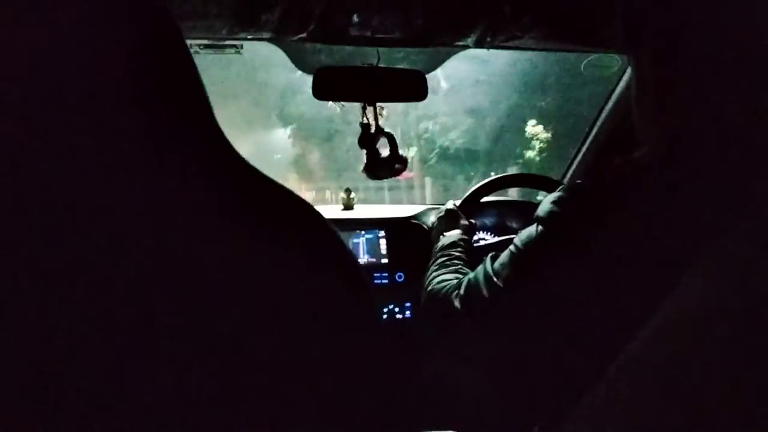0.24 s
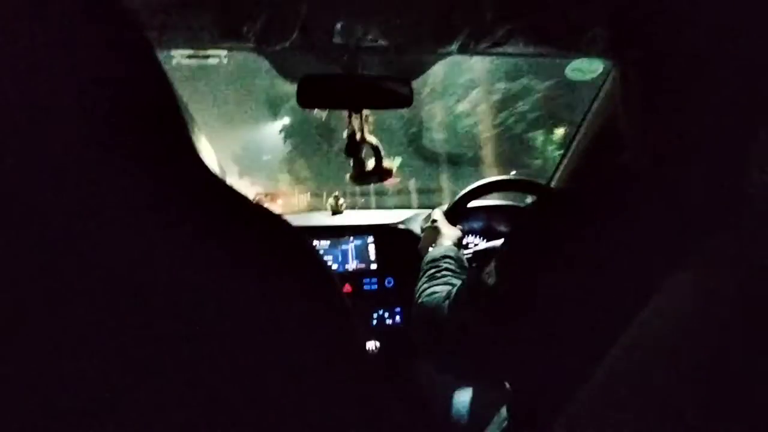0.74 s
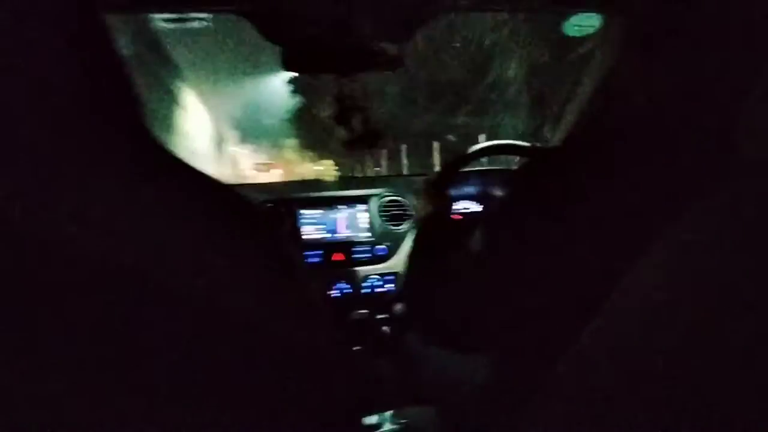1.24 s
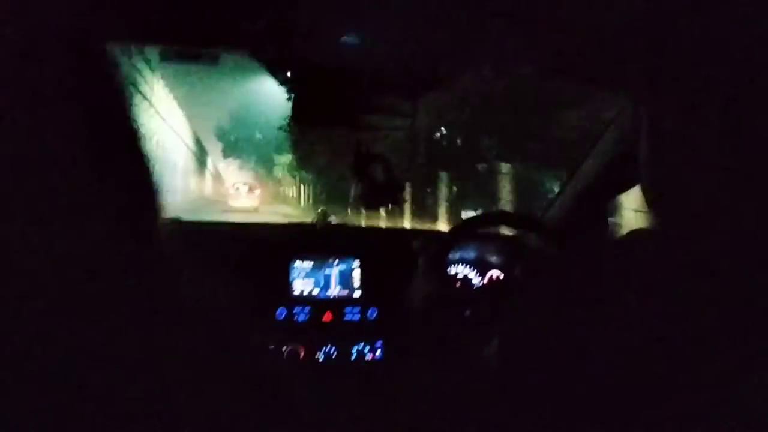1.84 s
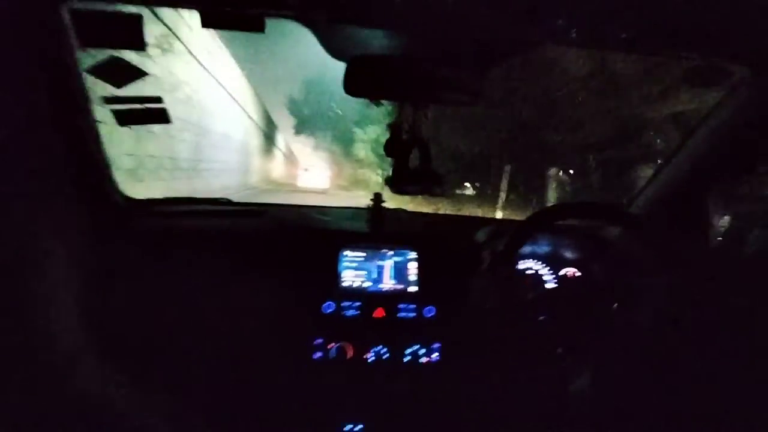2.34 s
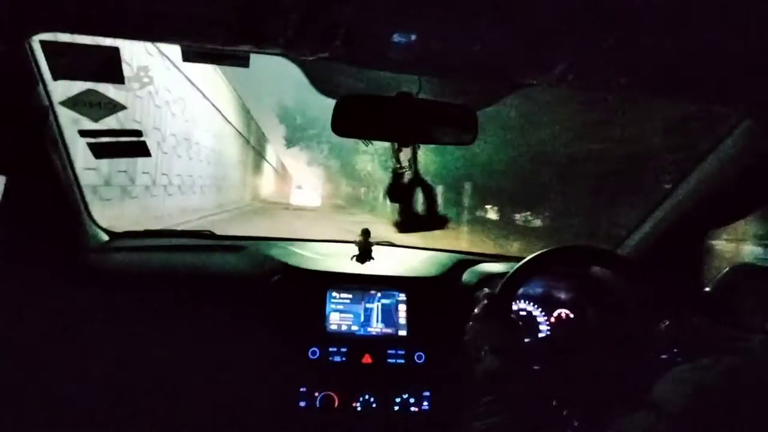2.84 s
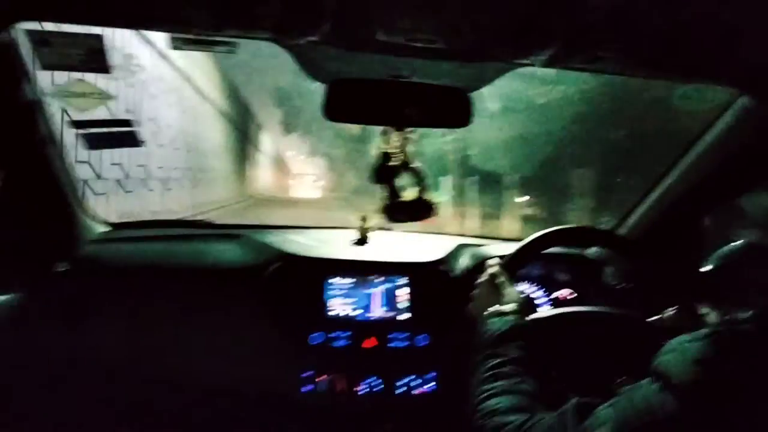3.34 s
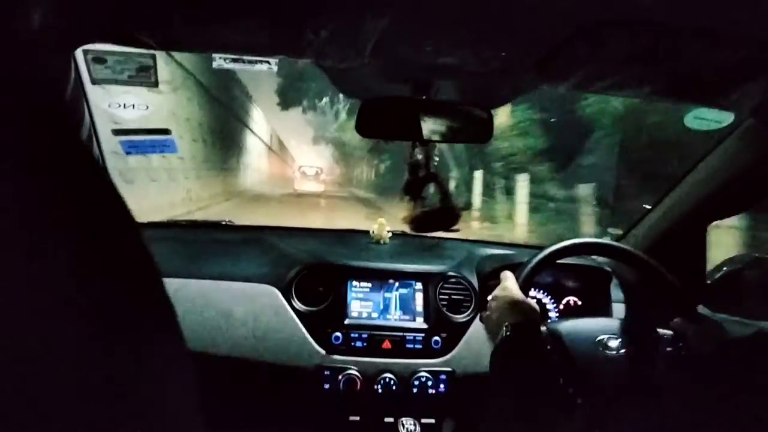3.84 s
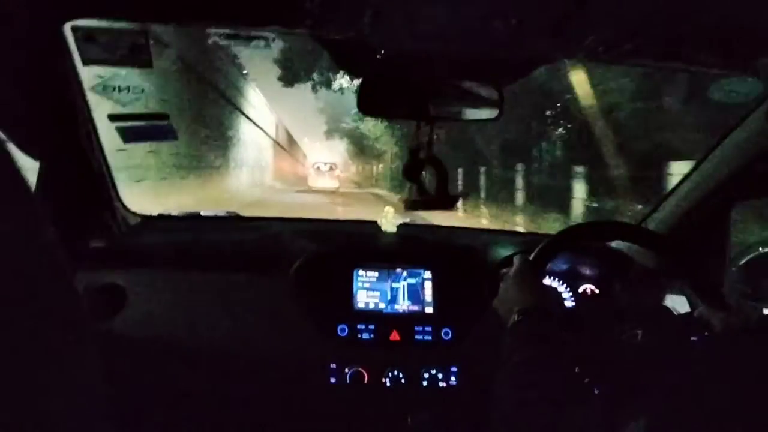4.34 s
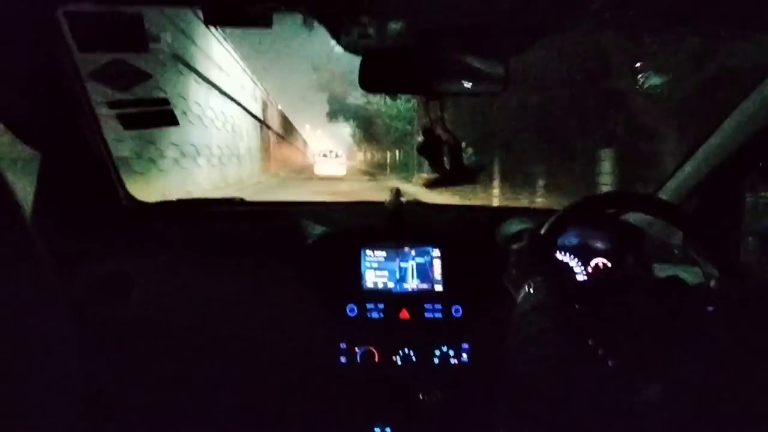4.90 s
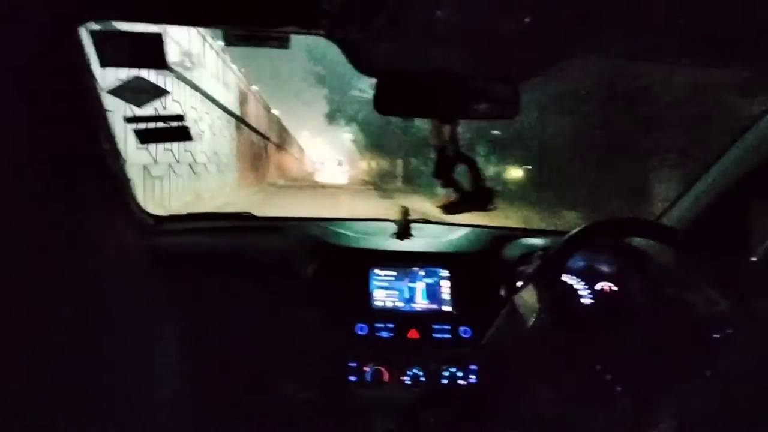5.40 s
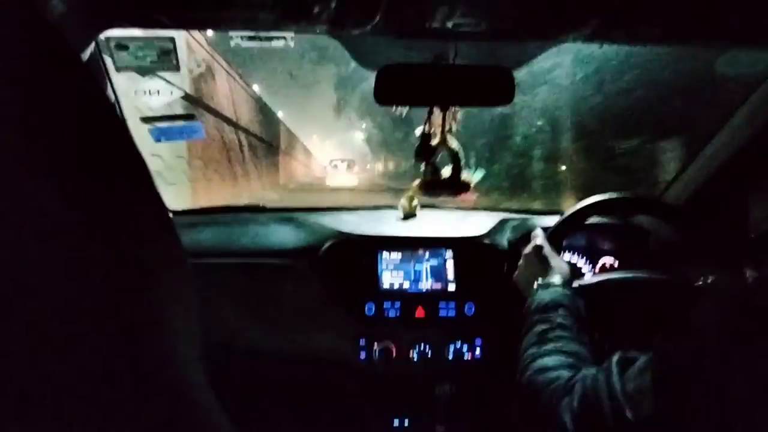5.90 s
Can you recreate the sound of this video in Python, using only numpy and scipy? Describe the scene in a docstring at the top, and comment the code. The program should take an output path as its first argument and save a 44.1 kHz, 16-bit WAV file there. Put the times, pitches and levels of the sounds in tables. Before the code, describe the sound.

A handheld microphone inside a closed car cabin picks up mostly bass: surging road rumble, soft tyre noise and an engine hum that quickly sinks and later partly returns. Sharp clicks and very brief cuts to silence interrupt, mostly at the start. Faint fabric rustles lie on top. A burst of four dull, ringing thumps comes past four seconds, then the drive settles.

```python
"""Inside a small car at night: filtered noise makes the rumble, roar and hiss, summed sines the rising engine hum.
The hum sinks in the first second and partly returns; coarse asphalt drums the floor at once and again near 4 s.
Three of six dropouts fall in the first second, three later; they and lone signal steps click.
Clothing scuffs from 0.27 s in grains of noise, and slides most between 1.2 and 2.7 s.
From 4.28 s four wheel blows on a rough patch jolt the cabin and ring the body in decaying sines."""
import sys
import numpy as np
from scipy import signal
from scipy.fft import rfft, irfft, next_fast_len
from scipy.io import wavfile
from scipy.ndimage import uniform_filter1d

SR = 44100
rng = np.random.default_rng(int(sys.argv[2]) if len(sys.argv) > 2 else 0)


def wrap_up_sound(samples):
    """Save the sound to the file named by the first command line argument, as 16-bit audio."""
    columns = np.atleast_2d(samples).T
    # keep every value between -1 and 1, then stretch to whole-number steps
    tamed = np.clip(columns, -1, 1)
    steps = np.round(tamed * 32767).astype(np.int16)
    wavfile.write(sys.argv[1], SR, steps)


N = 271567
TIME = np.arange(N) / SR  # s

# Unevenness of the road, as the level of the body's deep rumble: time_s, level_db
ROAD_UNEVENNESS = [(0, -35.5), (.33, -20.5), (.48, -28), (1.05, -30.5), (1.27, -28), (1.65, -34.5),
                   (2.08, -27), (2.47, -24.5), (2.58, -35.5), (2.9, -28.5), (3.52, -34.5), (3.72, -26.5),
                   (4.25, -24), (4.68, -20.5), (4.82, -30.5), (5.2, -28), (5.35, -30.5), (6.15, -31)]
USUAL_ROAD_DB = -30  # unevenness that leaves the panels and cabin air unchanged
# Coarse asphalt: start_s, end_s, panel_lift_db, air_lift_db
COARSE_STRETCHES = [(0, 0.39, 5.5, 5.5), (0.695, 0.837, 8.5, 9.5), (3.987, 4.403, 3, 2.5),
                    (4.454, 4.59, 11, 10)]
PANEL_LIFT, AIR_LIFT = 2, 3  # columns of COARSE_STRETCHES
# Spectrum of the body's rumble, relative: freq_hz, density_db (per Hz)
RUMBLE_SPECTRUM = [(8, -13.5), (18, -13.5), (30, 0.5), (45, 1), (58, -2), (72, -18.5), (100, -32),
                   (200, -42.5), (1000, -110)]
# Spectrum of the floor panels, relative: freq_hz, density_db (per Hz)
PANEL_SPECTRUM = [(20, -15), (50, -4.5), (68, 4), (95, 0.5), (118, -2), (135, -14), (180, -18), (300, -60),
                  (1000, -89)]
# Spectrum of the tyre roar, relative: freq_hz, density_db (per Hz)
ROAR_SPECTRUM = [(60, -10), (130, 0.5), (185, -1.5), (280, -2.5), (340, -10), (400, -7.5), (520, -12.5),
                 (780, -18.5), (1150, -18.5), (1400, -22.5), (1850, -24), (3000, -33.5), (3900, -37),
                 (5200, -46.5), (16000, -79)]
# Standing waves of the cabin air: freq_hz, width_hz, lift_db
CABIN_MODES = [(206, 29, 1), (239.5, 13.6, 6), (288, 29, 3), (385, 45, 3), (428, 24, 1), (531, 16, 3),
               (648, 32, 3.5), (1144, 59, 1.5)]
# Tread whine: time_s, level_db
WHINE_LEVEL = [(.2, -63), (.9, -65.5), (1.4, -63.5), (1.9, -77), (6.15, -67.5)]
# Engine speed and load: time_s, firing_rate_hz, level_db
ENGINE_RUN = [(0, 73.2, -25), (1, 75, -45), (2, 79.25, -38.5), (3, 80.56, -39), (4, 80.88, -33),
              (5, 81.52, -32), (6.15, 81.78, -36)]
# Balance of the engine orders: multiple of the firing rate, relative_level_db
ORDER_BALANCE = [(1, 8.5), (2, -39), (3, -12), (4, -30), (5, -37)]
# Spectrum of the air hiss, relative: freq_hz, density_db (per Hz)
HISS_SPECTRUM = [(1000, -5), (4000, -14), (5200, 2.5), (7200, 9.5), (8600, 4.5), (10800, 6), (12500, -1.5),
                 (14000, -6), (16000, -3)]
# Silences with a click at either edge: start_s, end_s, step_height_db
SILENCES = [(.0981, .1488, -33), (.4475, .5224, -28.5), (.6931, .7573, -29.5), (2.508, 2.558, -40),
            (3.9244, 4.003, -29.3), (4.4723, 4.538, -17.7)]
# Lone jumps in the signal: time_s, step_height_db
LONE_JUMPS = [(0.1917, -31.5), (.608, -19.5), (.6295, -32.5), (0.8219, -24), (2.7515, -29), (2.9861, -26.5),
              (4.046, -30.5), (4.0885, -24), (4.11, -31), (4.5812, -15.5)]
# Spectrum of the fabric, relative: freq_hz, density_db (per Hz)
FABRIC_SPECTRUM = [(400, -33), (1500, -1), (3000, 5.5), (4000, 7), (5000, 0), (6000, 5.5), (7000, 7.5),
                   (8800, 2.5), (11000, 3.5), (12500, -5), (14000, -12), (16000, -41)]
# Short scuffs and ticks of clothing: start_s, level_db, decay_s, brightness_db (per octave)
CLOTH_SCUFFS = [(0.271, -63, .005, -4), (0.86, -54, 0.0065, -2), (0.901, -63, 0.006, 8),
                (0.929, -52.5, 0.0062, 8), (1.054, -61.5, 0.013, 0), (1.104, -48, 0.0084, 4),
                (1.597, -55, 0.015, -4.5), (1.772, -47.5, 0.0077, -12.5), (2.3212, -35.5, 0.00041, -6),
                (2.435, -52.5, 0.0088, 4), (3.033, -60, .011, 5), (3.056, -51, 0.008, -1),
                (3.152, -55.5, 0.01, 2.5), (3.207, -53, 0.0085, 0), (3.406, -66, .012, 4),
                (3.876, -60.5, .01, -6.5), (4.146, -58, 0.006, -2), (4.543, -46, 0.01, -7),
                (6.081, -63.5, 0.015, 5), (6.108, -64, 0.0047, 5)]
# Strokes of sliding clothing: start_s, end_s, level_db
CLOTH_SLIDES = [(.28, .4, -78), (1.219, 1.376, -65), (1.446, 2.06, -64), (2.122, 2.408, -65.5),
                (2.52, 2.727, -67), (3.2, 3.52, -76.5), (4.249, 4.338, -61), (4.404, 4.555, -61),
                (5.301, 5.6, -76.5), (5.87, 6.15, -76)]
# Wheels striking the rough patch, relative: start_s, level_db
WHEEL_BLOWS = [(4.283, -6.5), (4.365, -13), (4.455, -9), (4.544, -9.5)]
# What a wheel blow rings: pitch_hz, relative_level_db, t60_s
BLOW_RINGS = [(35.1, -0.5, 0.36), (51.5, 2.5, 0.22), (93, -8, 0.079), (121.4, -5.5, 0.17), (154, -13, 0.21),
              (211.5, -16, 0.24), (272.7, -21.5, 0.17), (340, -21.5, 0.093), (682, -30, 0.1)]


def gain_of(db):
    """Decibels to amplitude."""
    return 10 ** (np.asarray(db) / 20)


def evened(x):
    """Scales to an rms of 1."""
    return x / np.sqrt(np.mean(x ** 2) + 1e-20)


def curve(rows, column=1):
    """One column of a time table, drawn as straight lines at every sample."""
    columns = np.transpose(rows)
    return np.interp(TIME, columns[0], columns[column])


def read(points, hz):
    """A spectrum in dB, joined on a log-frequency axis."""
    f, db = np.transpose(points)
    return np.interp(np.log(hz + 1), np.log(f + 1), db)


def noise(colour, size=N):
    """Noise of rms 1 whose dB spectrum is colour(Hz)."""
    n = next_fast_len(size)
    white = rfft(rng.standard_normal(n))
    tint = gain_of(colour(np.fft.rfftfreq(n, 1 / SR)))
    return evened(irfft(white * tint, n)[:size])


def drift(rate_hz):
    """Slow random wander of rms 1, steeply damped above its rate."""
    return noise(lambda hz: -20 * np.log10(1 + (hz / rate_hz) ** 4))


def band(centre_hz, half_width_hz, size=N):
    """Fuzzy narrow band of noise, 6 dB down at half_width_hz from its centre."""
    return noise(lambda hz: -20 * np.log10(1 + ((hz - centre_hz) / half_width_hz) ** 2), size)


def steadied(x, seconds):
    """Evens out the slow swells of a noise and keeps its quick beats."""
    power = np.mean(x ** 2) / 20 + x ** 2  # the small floor avoids boosting near-silence
    size = max(int(seconds * SR), 2)
    smooth_power = uniform_filter1d(uniform_filter1d(power, size), size)
    return evened(x / np.sqrt(smooth_power))


def add(mix, start_s, sound):
    """Mixes a sound in at a time."""
    part = mix[max(round(start_s * SR), 0):][:len(sound)]
    part += sound[:len(part)]


def held(start_s, end_s, attack_s, release_s):
    """Envelope that rises from its start and dies away exponentially after its end."""
    attack = 1 - np.exp(-np.maximum(TIME - start_s, 0) / attack_s)
    return attack * np.exp(-np.maximum(TIME - end_s, 0) / release_s)


def jolt(rise_s, decay_s):
    """Shaking left by the wheel blows: each starts fast and dies away, and their powers add."""
    power = sum((gain_of(db) * held(s, s, rise_s, decay_s)) ** 2 for s, db in WHEEL_BLOWS)
    return np.sqrt(power)


def shaking(road_share, lift_column, attack_s=0.023, release_s=0.025):
    """Gain of a part that follows a share of the road's unevenness and is lifted by coarse asphalt."""
    coarse_db = sum(row[lift_column] * held(row[0], row[1], attack_s, release_s)
                    for row in COARSE_STRETCHES)
    return gain_of(road_share * (curve(ROAD_UNEVENNESS) - USUAL_ROAD_DB) + coarse_db)


def body(heave_jolt_db=-10, surge_db=0.96, drum_db=-36, drum_jolt_db=-22):
    """The road heaves the body in uneven surges and drums the floor panels; wheel blows stir both."""
    heave = steadied(noise(lambda hz: read(RUMBLE_SPECTRUM, hz)), seconds=0.037)
    drum = steadied(noise(lambda hz: read(PANEL_SPECTRUM, hz)), seconds=0.033)
    blows = jolt(rise_s=0.0075, decay_s=0.1)
    # rolling and blows are independent, so their powers add
    surging = gain_of(curve(ROAD_UNEVENNESS) + surge_db * drift(4.9))
    heave_gain = np.hypot(surging, gain_of(heave_jolt_db) * blows)
    rattling = gain_of(drum_db) * shaking(road_share=0.1, lift_column=PANEL_LIFT)
    drum_gain = np.hypot(rattling, gain_of(drum_jolt_db) * blows)
    return heave_gain * heave + drum_gain * drum


def cabin(hz):
    """Lift in dB from the standing waves of the cabin air."""
    return sum(db / (1 + (2 * (hz - f) / width) ** 2) for f, width, db in CABIN_MODES)


def tyres(grit_db=1.0, lump_db=0.2, split_hz=750, low_db=-44, high_db=-44.0,
          low_jolt_db=-26, high_jolt_db=-29, fall_db_per_s=0.15):
    """Tyre roar coloured by the cabin; its low part slowly eases, and bumps lift it more than the high part."""
    roar = noise(lambda hz: read(ROAR_SPECTRUM, hz) + cabin(hz))
    low = signal.sosfiltfilt(signal.butter(2, split_hz, fs=SR, output="sos"), roar)
    high = roar - low
    blows = jolt(rise_s=0.006, decay_s=0.14)
    easing_db = low_db - fall_db_per_s * (TIME - TIME.mean())
    low_gain = np.hypot(gain_of(easing_db), gain_of(low_jolt_db) * blows)
    high_gain = np.hypot(gain_of(high_db), gain_of(high_jolt_db) * blows)
    lumps = gain_of(lump_db * drift(9.0))
    grit = gain_of(grit_db * drift(25))
    return low * low_gain * lumps + high * high_gain * grit


def boom(boom_hz=151, width_hz=24, level_db=-45, jolt_db=-28, fall_db_per_s=0.9):
    """The strongest standing wave of the cabin, shaken at random by the road; it slowly eases."""
    wave = noise(lambda hz: -20 * np.log10(1 + ((hz - boom_hz) / width_hz * 2) ** 6))
    easing_db = level_db - fall_db_per_s * (TIME - TIME.mean())
    rolling = gain_of(easing_db) * shaking(road_share=0.059, lift_column=AIR_LIFT)
    blows = gain_of(jolt_db) * jolt(rise_s=0.014, decay_s=0.1)
    return np.hypot(rolling, blows) * steadied(wave, 0.28)


def tread(drone_db=6):
    """The tread blocks sing in a narrow, fuzzy band, with a broader drone below it in pitch."""
    whine = band(centre_hz=990, half_width_hz=22)
    drone = band(centre_hz=405, half_width_hz=50)
    return gain_of(curve(WHINE_LEVEL)) * (whine + gain_of(drone_db) * drone)


def engine(waver=0.0044, throb_db=3.0):
    """Low orders of the firing rate, with a slight waver of pitch and a throb on each order."""
    firing_hz = curve(ENGINE_RUN) * (1 + waver * drift(5.2))
    turns = np.cumsum(firing_hz) / SR  # phase in firing cycles
    hum = np.zeros(N)
    for order, db in ORDER_BALANCE:
        throb = gain_of(db + throb_db * drift(7.1))
        hum += throb * np.sin(2 * np.pi * (round(order) * turns + rng.random()))
    return gain_of(curve(ENGINE_RUN, column=2)) * evened(hum)


def hiss(level_db=-74.5):
    """Faint steady hiss of air, as coloured noise."""
    return gain_of(level_db) * noise(lambda hz: read(HISS_SPECTRUM, hz))


def jumps(settle_s=0.0018):
    """Each click is a sheer step, up or down, with short tails: at the edges of every silence and alone."""
    out = np.zeros(N)
    t = TIME[:SR // 50]
    fall = np.exp(-t / settle_s)
    lead_s = len(t) / SR
    for start, end, db in SILENCES:
        add(out, start - lead_s, rng.choice([-1, 1]) * gain_of(db) * fall[::-1])
        add(out, end, rng.choice([-1, 1]) * gain_of(db) * fall)
    for s, db in LONE_JUMPS:
        step = np.r_[-fall[::-1], fall] / 2  # leaps from -1/2 to 1/2 in the middle
        add(out, s - lead_s, rng.choice([-1, 1]) * gain_of(db) * step)
    return out


def clothing(grain_db=1.5, rise_share=0.3, crackle_db=3.5, tail_db=-22, tail_factor=3.2, jolt_db=-43.0):
    """Fabric slides with a fine grain, in strokes and at each jolt; slipping folds give gritty scuffs."""
    strokes = sum(gain_of(db) * held(start, end, attack_s=0.027, release_s=0.072)
                  for start, end, db in CLOTH_SLIDES)
    sliding = np.hypot(strokes, gain_of(jolt_db) * jolt(rise_s=0.0058, decay_s=0.03))
    fabric = noise(lambda hz: read(FABRIC_SPECTRUM, hz))
    out = fabric * sliding * gain_of(grain_db * drift(60))
    t = TIME[:SR // 8]
    for s, db, decay, tilt in CLOTH_SCUFFS:
        def colour(hz):
            """Fabric spectrum tilted about 7 kHz."""
            return read(FABRIC_SPECTRUM, hz) + tilt * np.log2(np.clip(hz, 500, 11000) / 7000)

        slip = noise(colour, size=len(t))
        grain = evened(uniform_filter1d(rng.standard_normal(len(t)), size=50))
        age = t / decay
        onset = 1 - np.exp(-(age / rise_share) ** 2)
        shape = onset * (np.exp(-age) + gain_of(tail_db) * np.exp(-age / tail_factor))
        add(out, s, gain_of(db + crackle_db * grain) * slip * shape / shape.max())
    return out


def thin_hiss(level_db=-77, start_s=0.28, length_s=0.14):
    """A brief, thin and very high hiss: a narrow band of noise, faded in and out."""
    size = int(length_s * SR)
    out = np.zeros(N)
    thin = band(centre_hz=11900, half_width_hz=500, size=size)
    add(out, start_s, gain_of(level_db) * thin * signal.windows.tukey(size))
    return out


def thuds(rise_s=0.0069):
    """Each wheel blow sets the suspension, panels and cabin air ringing as decaying sines."""
    out, t = np.zeros(N), TIME[:SR // 2]
    for s, blow_db in WHEEL_BLOWS:
        ring = sum(gain_of(db - 60 * t / t60) * np.sin(2 * np.pi * (hz * t + rng.random()))
                   for hz, db, t60 in BLOW_RINGS)
        add(out, s, gain_of(blow_db) * ring * (1 - np.exp(-t / rise_s)))
    return out


def scene():
    """Everything heard in the cabin, as one channel."""
    car = body() + tyres() + boom() + tread() + engine() + thuds()
    return (car + hiss() + clothing() + thin_hiss())[None]


def record(dry, edge_hz=16200):
    """The signal cuts out and clicks; then a steep low-pass limits the band."""
    passing = np.ones(N)
    for start, end, _ in SILENCES:
        passing[(TIME > start) & (TIME < end)] = 0
    broken = dry * uniform_filter1d(passing, size=64) + jumps()
    low_pass = signal.firwin(511, edge_hz, window=("kaiser", 9), fs=SR)
    return signal.oaconvolve(broken, low_pass[None], "same")


dry = scene()
out = record(dry)
wrap_up_sound(out)
```